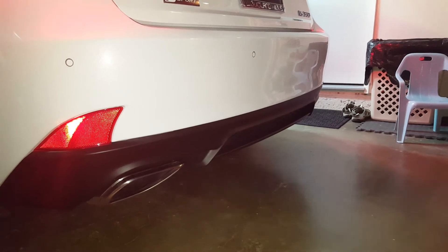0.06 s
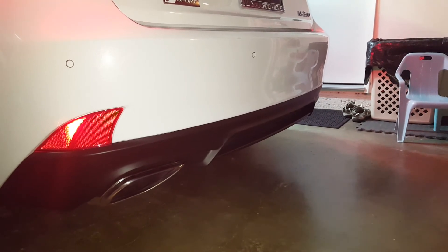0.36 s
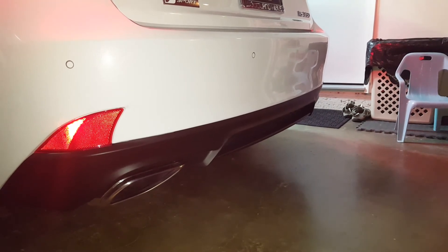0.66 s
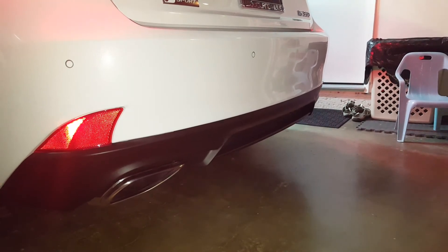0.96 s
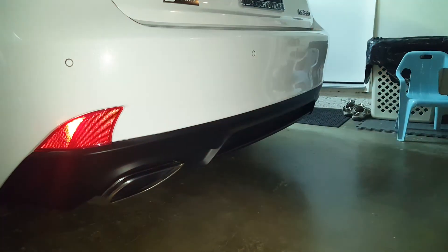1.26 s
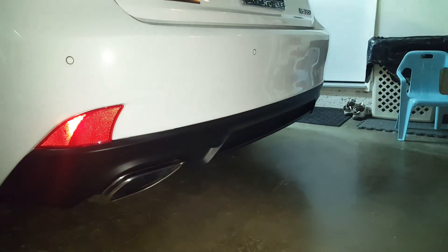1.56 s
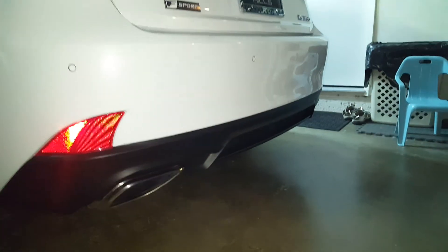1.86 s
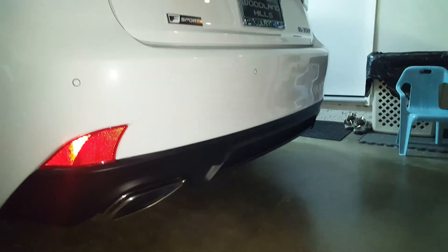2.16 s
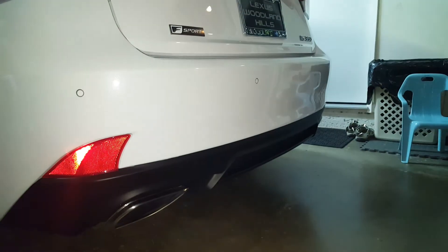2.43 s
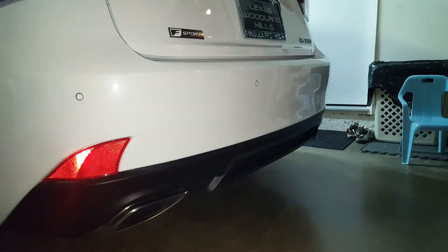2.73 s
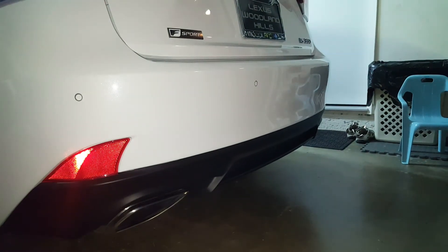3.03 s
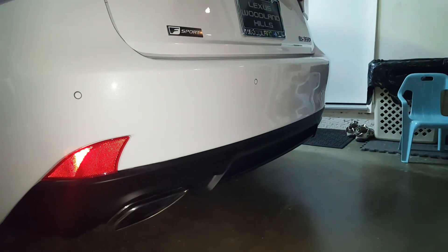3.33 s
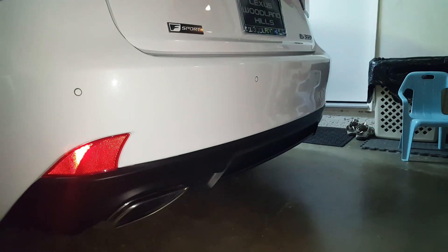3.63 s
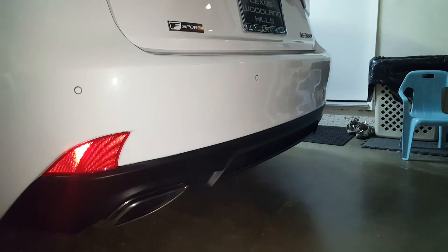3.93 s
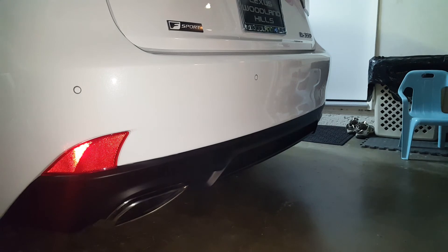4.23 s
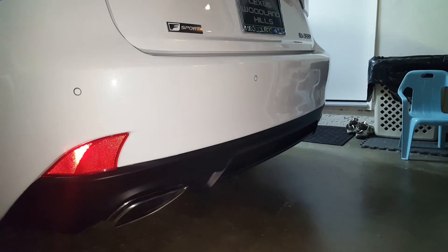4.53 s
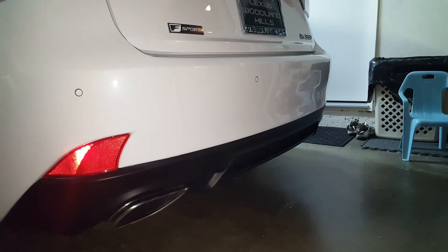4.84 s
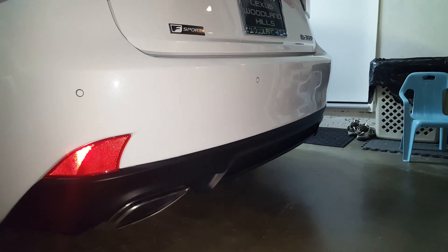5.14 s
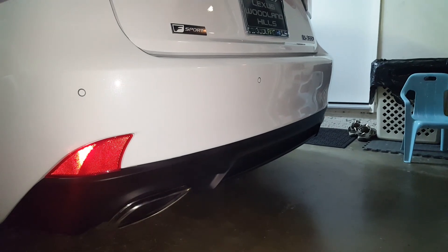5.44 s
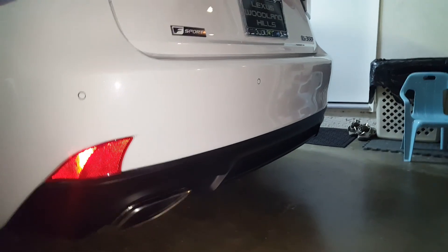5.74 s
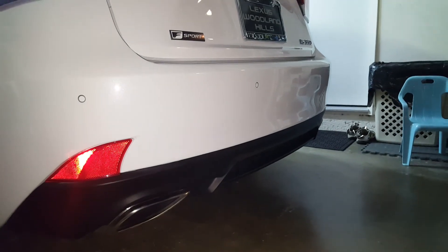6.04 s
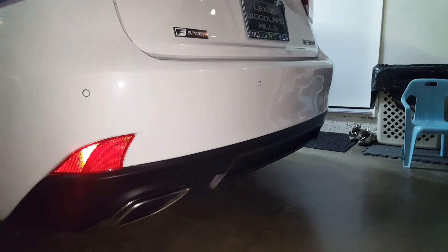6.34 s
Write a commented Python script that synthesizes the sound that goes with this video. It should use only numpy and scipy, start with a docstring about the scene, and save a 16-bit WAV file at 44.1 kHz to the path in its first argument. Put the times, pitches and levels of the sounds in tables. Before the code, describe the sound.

A six-cylinder petrol car engine is heard close to the tailpipe in a garage. It starts at the top of a hard rev, loud, growling and raspy, with a dull muffler thump right at the start. From there the revs fall smoothly until about 4 seconds. The exhaust note booms in swells and dips as it drops, while a belt whine slides down with it and the rumble and hiss of gas fade. Another soft, low thump comes at about 2.4 seconds. From around 4 seconds the engine sits at a quiet, low idle, throbbing more strongly between about 4.4 and 5.7 seconds. With a very faint knock it then eases and idles lightly until the end, at about 6.5 seconds. Faint valve ticking runs through the hiss, and the hard walls and floor give the rasp, hiss and ticks a short, dense echo.

```python
"""In a garage, beside the tailpipe of a six-cylinder petrol car. The revs fall from a hard blip to a
quiet idle, which throbs under load for a moment and then eases. The note of the firing cylinders booms
as it slides through resonances (pitches that the pipe and room favour). Belt-driven parts whine, uneven
cylinders growl, gas rumbles, rasps and hisses, the valves tick, and the muffler gives a few dull thumps.
Hard walls and floor smear the rasp, hiss and ticks."""
import sys
import numpy as np
from scipy import signal
from scipy.fft import rfft, irfft
from scipy.io import wavfile

SR = 44100
rng = np.random.default_rng(int(sys.argv[2]) if len(sys.argv) > 2 else 0)


def int16_out(signal):
    """Quantize to a 16-bit WAV file."""
    q = np.round(np.clip(np.atleast_2d(signal).T, -1, 1) * 32767)
    wavfile.write(sys.argv[1], SR, q.astype(np.int16))


N = 286209
TIME = np.arange(N) / SR
STEP = 200  # samples between updates of slowly changing values
SLOW_TIME = TIME[::STEP]
CYLINDERS = 6
PIPE_LAG, JET_LAG = 13, 22  # samples by which pipe notes and gas jet reach the right ear late

# engine speed as firings per second: a blip, a long fall, then idle (t/s, f/Hz)
FIRING_RATE = [(0, 266.5), (.1, 264.5), (.25, 243.7), (.6, 212.1), (.8, 192.6), (1.2, 158.2), (1.6, 127.3),
               (2.2, 84.12), (2.5, 73.13), (3.2, 56.42), (3.8, 45.4), (4.1, 41.95), (4.4, 40.05),
               (5, 38.75), (5.8, 38.87), (6.49, 38.7)]
# how hard the engine works: it catches itself above idle, pulls, then runs free (t/s, load 0-1)
ENGINE_LOAD = [(3.3, 0), (3.45, 0.15), (3.8, 0.27), (4.0, 0.5), (4.25, 0.5), (4.42, 0.64), (4.47, 0.76),
               (5.7, 0.79), (5.8, 0.36), (5.93, 0.1), (6.2, 0)]
# loudness rules, one each for 1, 2 and 3 times the firing rate
# (level/dB at free idle, rise/dB per doubling of gas flow, rise/dB at full load)
BOOM_RULES = [(-3, 2.5, 23), (-23, 9.5, 18.5), (-19, 4, 15)]
# the same three columns for the growl and the gas noises
GROWL_RULE = (-62, 13.7, 5.8)
RUMBLE_RULE = (-48, 8.6, 2.5)
RASP_RULE = (-51.5, 8.5, 9)
HISS_RULE = (-43, 11.8, 0.72)
# resonances of exhaust and garage that the firing note booms in (f/Hz, width/Hz, level/dB)
BOOM_RESONANCES = [(54, 4.8, -28), (67.3, 8.2, -33.5), (80.8, 6.7, -24.5), (99, 9.7, -25.5),
                   (106.5, 13.2, -22.5), (130.2, 16.4, -29), (162.4, 3.7, -29), (209.4, 13, -34),
                   (248.7, 18, -33.5), (313.5, 7.9, -20), (354.3, 13.6, -15.5), (380, 40, -15.5),
                   (453, 16.7, -10), (520, 52, -21.5), (675, 250, -28)]
# pitches at which wall echoes cancel the firing note (f/Hz, width/Hz, depth/dB)
ECHO_DIPS = [(40.8, 2, 13.5), (85, 3.5, 10), (188, 2.3, 9), (302, 4.6, 3), (360.8, 2.2, 19),
             (424.3, 2.8, 9), (449.3, 5.4, 31), (518, 4.3, 11)]
# standing waves in the tailpipe and muffler (f/Hz, width/Hz, level/dB)
PIPE_RESONANCES = [(69, 87, 6.5), (118.5, 15, 8.5), (154, 18, 6.5), (163, 9.5, -2), (233, 7, 4),
                   (296, 12, -22), (366, 85, 2.5), (453.8, 8.5, 10.5), (510.5, 25, 8), (596, 20, 9.5),
                   (653, 140, -2), (775, 6.3, 10), (949, 11, 3), (1030, 240, -5), (1170, 360, -0.5),
                   (1330, 13, 0), (1460, 16, 0)]
# engine tones that sing out as they pass a resonance
# (multiple of the firing rate, level/dB, resonance f/Hz, width/octaves, roughness 0-1)
ENGINE_TONES = [(1 / 3, -44, 70, .25, .3), (1 / 2, -35.5, 90, .36, .3), (1 / 2, -42, 60, .1, .3),
                (2 / 3, -33, 177, .04, .3), (2 / 3, -29, 145, .07, .3), (2 / 3, -33, 120, .2, .3),
                (1, -25, 201, .04, .2), (4 / 3, -33, 300, .07, .4), (4 / 3, -34, 250, .06, .3),
                (3 / 2, -37, 210, .08, .3), (5 / 3, -33, 400, .05, .3), (5 / 3, -33, 318, .04, .3),
                (3, -39, 440, .12, .3), (3, -41, 720, .08, .7), (3, -44, 150, .06, .3),
                (4, -32.5, 457, .05, .2), (4, -34, 385, .13, .2), (4, -35, 595, .09, .35),
                (5, -40, 360, .08, .2), (11 / 2, -37, 1250, .11, .8), (6, -38.5, 680, .09, .35),
                (6, -41, 405, .06, .2), (6, -43, 362, .05, .3), (6, -44.5, 305, .06, .4),
                (7.2, -34, 1204, .02, .2), (9, -49, 590, .2, .8), (9, -46, 351, .04, .42),
                (10, -47, 416, .04, .5), (12, -50, 468, .13, .55), (12, -50.5, 680, .12, .8)]
# tones of the belt-driven parts, with the same five columns
BELT_TONES = [(4.33, -36, 1040, .06, .7), (4.33, -35, 885, .04, .6), (8.65, -38, 2250, .06, .7),
              (8.65, -32, 1665, .022, .3), (8.65, -44, 1350, .3, .8), (11.8, -37, 2590, .06, .6),
              (12.95, -32, 2760, .009, .2), (12.95, -35.5, 2850, .15, .85), (12.95, -37, 2290, .025, .4),
              (12.95, -40.5, 2000, .18, .6), (17.3, -37, 4550, .08, .7), (17.3, -45, 2400, .3, .7),
              (17.9, -38, 4450, .1, .7), (17.9, -38.5, 2910, .04, .6), (19.9, -43, 3600, .2, .7)]
# tone colour of gas swirling in the muffler (f/Hz, level/dB)
RUMBLE_COLOUR = [(20, -20), (30, -7), (50, -5.5), (110, -2), (220, -9), (360, 6), (500, 5), (750, 1),
                 (1200, -13), (3000, -47)]
# tone colour of gas scraping the pipe mouth (f/Hz, level/dB)
RASP_COLOUR = [(480, 7), (660, 11), (950, -2.5), (1200, 6.5), (1390, 6.5), (1480, 12.5), (1580, 0),
               (1850, 3.5), (2420, -11), (2580, 4.5), (2760, 0), (3120, 8), (3500, -15), (8000, -27)]
# tone colour of hiss and ticking (f/Hz, left level/dB, right level/dB)
HISS_COLOUR = [(255, -0.5, -4), (553, 3, -3.5), (775, 4.5, 0), (950, 0, 1), (1430, 4, 2), (2410, -1.5, 2),
               (3130, -2.5, 5.5), (3460, -4, -2.5), (4590, -4.5, 3.5), (5735, 1.5, -7.5), (5920, -8, -20),
               (6960, 0, -13.5), (8210, -18.5, -18), (10280, -22.5, -28), (12500, -8, -27.5),
               (14040, -19.5, -43), (15500, -30, -39.5)]
# dull knocks in the muffler (t/s, f/Hz, level/dB, decay time/s)
MUFFLER_THUMPS = [(0, 235, -15, 0.059), (0.056, 65, -11.5, 0.021), (2.372, 65.3, -9.5, 0.038),
                  (5.701, 61.86, -28, 0.038)]


def from_db(db):
    """Turn decibels into a number to multiply a sound by."""
    return 10 ** (np.asarray(db) / 20)


def normalise(x):
    """Scale a sound so that its average strength (rms) is 1."""
    return x / np.sqrt(np.mean(x ** 2))


def wander(rate, times=TIME):
    """Drift smoothly to a new random value `rate` times a second."""
    points = rng.standard_normal(512)
    return np.interp(times * rate, np.arange(len(points)), points)


def ears(x, lag):
    """The sound reaches the right ear `lag` samples after the left."""
    return np.array([x, np.pad(x, (lag, 0))[:N]])


def loudness(rule, hz, load):
    """A level in dB that rises with gas flow and with load."""
    idle_db, doubling_db, load_db = rule
    flow = hz / np.hypot(hz, 230)  # the flow levels off around 230 firings a second
    return idle_db + doubling_db * np.log2(flow / flow.min()) + load_db * load


def resonance_db(hz):
    """How loud exhaust and garage make each pitch, with dips where echoes cancel it."""
    power = sum(from_db(db) ** 2 / (1 + 2 * ((hz - centre) / width) ** 2) ** 2
                for centre, width, db in BOOM_RESONANCES)
    dips = sum(depth / (1 + ((hz - centre) / width) ** 2) ** 2 for centre, width, depth in ECHO_DIPS)
    return 10 * np.log10(power) - dips


def boom(cycle, hz, load):
    """Each firing pushes and sucks air at the pipe mouth. Load makes these putts more even."""
    shake_db = 2 * (1 - 0.49 * load) * wander(25.09)
    slips = (0, load - 1, 0)  # radians: without load the second tone slips and the putts blur
    out = np.zeros(N)
    for k, (rule, slip) in enumerate(zip(BOOM_RULES, slips), 1):
        resonance = np.interp(TIME, SLOW_TIME, resonance_db(k * hz[::STEP]))
        size = from_db(loudness(rule, hz, load) + resonance + shake_db)
        out -= np.sqrt(2) * size * np.sin(2 * np.pi * k * CYLINDERS * cycle + slip)
    return out


def pipe_gain(hz):
    """How strongly the exhaust passes each pitch: its resonances add in power."""
    return np.sqrt(sum(from_db(db) ** 2 / (1 + (2 * (hz - centre) / width) ** 2)
                       for centre, width, db in PIPE_RESONANCES))


def rough_tone(turns, size, rough, flutter_hz):
    """A steady tone plus a random part that swells and cancels it; `rough` (0-1) sets the mix."""
    scatter = wander(flutter_hz, SLOW_TIME) + 1j * wander(flutter_hz, SLOW_TIME)
    gain = np.sqrt(1 - rough ** 2) + rough * scatter / np.std(scatter)
    angle = 2 * np.pi * turns + np.interp(TIME, SLOW_TIME, np.unwrap(np.angle(gain)))
    return -np.interp(TIME, SLOW_TIME, size * np.abs(gain)) * np.sin(angle)


def whine(table, cycle, hz, flutter_hz):
    """Tones follow the engine speed, swelling and dipping as they slide through resonances."""
    out = np.zeros(N)
    for multiple, db, centre_hz, octaves, rough in table:
        pitch = multiple * hz[::STEP]
        nearness = np.exp(-.5 * (np.log2(pitch / centre_hz) / octaves) ** 2)
        size = np.sqrt(2) * from_db(db) * nearness * pipe_gain(pitch) / pipe_gain(centre_hz)
        out += rough_tone(multiple * CYLINDERS * cycle, size, rough, flutter_hz)
    return out


def growl(cycle, hz, uneven_db, bank_db, crank_db):
    """Unequal cylinders add tones at multiples of the cycle rate, which the pipe then shapes."""
    out = np.zeros(N)
    for k in range(5, 50):
        if k % CYLINDERS == 0 and k <= 3 * CYLINDERS:
            continue  # these three tones are the boom
        if k % (CYLINDERS // 2) == 0:  # in step with a bank of three cylinders
            db = bank_db
        else:
            db = uneven_db if k % 2 else crank_db
        size = pipe_gain(k * hz[::STEP] / CYLINDERS) * from_db(db)
        out += rough_tone(k * cycle + rng.random() * (k % 2), size, rough=0.95, flutter_hz=20)
    return out


def puffs(cycle, depth):
    """Gas noise that swells with each firing."""
    return rng.standard_normal(N) * (1 + depth * np.cos(2 * np.pi * CYLINDERS * cycle))


def colour(x, table, column=1):
    """Shape a sound with a tone colour table, fading out the bass below its first row."""
    table = np.array(table)
    hz = np.arange(N // 2 + 1) * SR / N
    gain = from_db(np.interp(np.log(hz + 1), np.log(table[:, 0]), table[:, column]))
    bass_fade = np.minimum(hz / table[0, 0], 1) ** 2
    return irfft(rfft(x) * gain * bass_fade, N)


def rumble(cycle, puff_depth):
    """Gas swirls in the muffler, pumped by the firings. Its bass is alike at both ears."""
    middle = colour(puffs(cycle, puff_depth), RUMBLE_COLOUR)
    bass_cut = signal.butter(1, 2400, "high", fs=SR, output="sos")
    side = signal.sosfilt(bass_cut, colour(rng.standard_normal(N), RUMBLE_COLOUR))
    return normalise(ears(middle, PIPE_LAG) + np.array([side, -side]))


def garage(x, echo_db):
    """Add a short, dense tail of echoes off the hard surfaces around the pipe."""
    t = TIME[:SR // 4]
    tail = rng.standard_normal(len(t)) * np.exp(-np.log(1000) * t / 0.22)  # 60 dB down in 0.22 s
    return x + from_db(echo_db) * signal.oaconvolve(x, tail / np.linalg.norm(tail))[:N]


def rasp(cycle):
    """Gas scrapes the pipe mouth at each firing and reaches each ear off different walls."""
    jet = colour(puffs(cycle, depth=0.63), RASP_COLOUR)
    return normalise(np.array([garage(side, echo_db=7.5) for side in ears(jet, JET_LAG)]))


def ticks(cycle, hz, scatter_db=1.5, per_cycle=240):
    """Valves and gas jets strike at the same points in every cycle, never quite equally hard."""
    points, signs = rng.random(per_cycle), rng.choice([-1, 1], per_cycle)
    strikes = (np.arange(int(cycle[-1]) + 1)[:, None] + points).ravel()
    samples = np.searchsorted(cycle, strikes[strikes < cycle[-1]])
    sizes = np.resize(signs, len(samples)) * from_db(scatter_db * rng.standard_normal(len(samples)))
    return normalise(np.bincount(samples, sizes, N) / np.sqrt(hz))


def hiss_and_ticks(cycle, hz):
    """Hissing gas puffs with each firing, the valves tick through it, and both echo off the walls."""
    gas = from_db(-6) * ears(puffs(cycle, depth=0.18), JET_LAG) + rng.standard_normal((2, N))
    echoed = [garage(side + from_db(-2) * ticks(cycle, hz), echo_db=-9) for side in gas]
    sound = np.array([colour(echoed[ear], HISS_COLOUR, column=1 + ear) for ear in range(2)])
    dull = signal.sosfilt(signal.butter(1, 3500, fs=SR, output="sos"), sound)
    treble_gain = from_db(-2 * hz.min() / hz)  # slow gas makes less treble
    return normalise(dull + treble_gain * (sound - dull))


def thumps(rise_s=0.022):
    """Late-burning gas gives the muffler a few soft, low knocks."""
    out = np.zeros(N)
    for start, hz, db, decay in MUFFLER_THUMPS:
        age = np.maximum(TIME - start, 0)
        swell = 1 - np.exp(-(age / rise_s) ** 2)
        out += from_db(db) * np.sin(2 * np.pi * hz * age) * swell * np.exp(-age / decay)
    return out


def scene():
    """Mix it all: speed sets the engine's pitches; speed and load set how loud boom, growl and gas are."""
    hz = np.interp(TIME, *np.transpose(FIRING_RATE))
    load = np.interp(TIME, *np.transpose(ENGINE_LOAD))
    cycle = np.cumsum(hz) / SR / CYLINDERS  # in one cycle the crank turns twice and each cylinder fires

    def gain(rule):
        return from_db(loudness(rule, hz, load))

    notes = boom(cycle, hz, load)
    notes += from_db(0.7) * whine(ENGINE_TONES, cycle, hz, flutter_hz=22)
    notes += gain(GROWL_RULE) * growl(cycle, hz, uneven_db=-7.5, bank_db=-6, crank_db=-2.5)
    belt = np.array([whine(BELT_TONES, cycle, hz, flutter_hz=35) for ear in range(2)])
    noises = gain(RUMBLE_RULE) * rumble(cycle, puff_depth=0.28 + 0.26 * load)
    noises += gain(RASP_RULE) * rasp(cycle)
    noises += gain(HISS_RULE) * hiss_and_ticks(cycle, hz)
    return ears(notes + thumps(), PIPE_LAG) + belt + noises


def record(dry):
    """Cut the highest treble, above 15600 Hz, as a phone does."""
    return signal.sosfilt(signal.ellip(10, .2, 80, 15600, fs=SR, output="sos"), dry)


dry = scene()
out = record(dry)
int16_out(out)
```